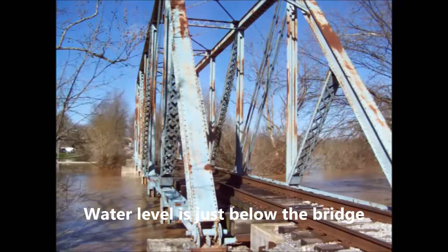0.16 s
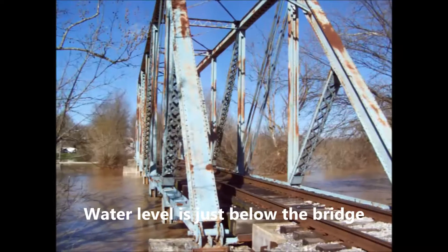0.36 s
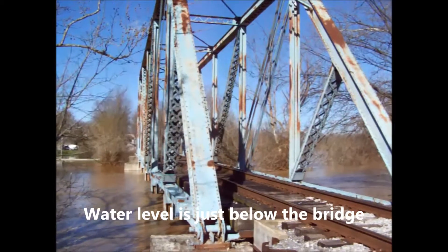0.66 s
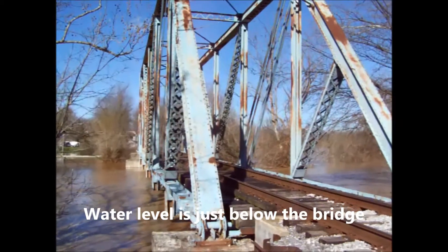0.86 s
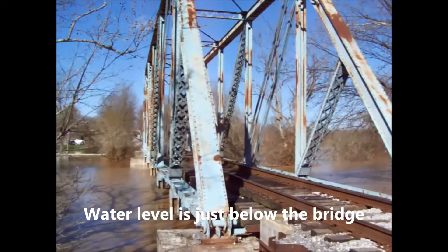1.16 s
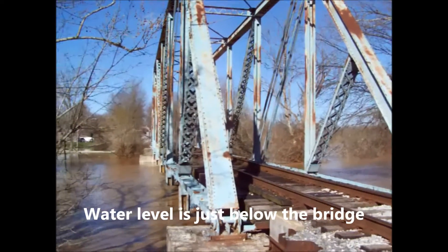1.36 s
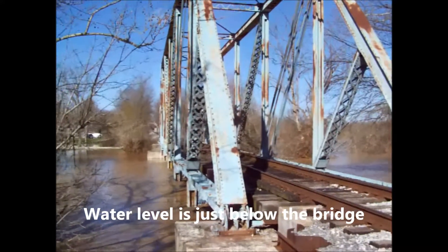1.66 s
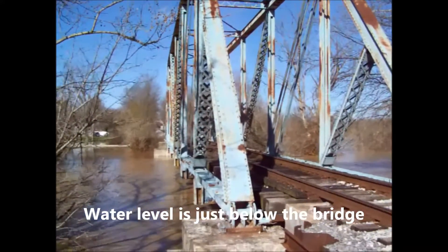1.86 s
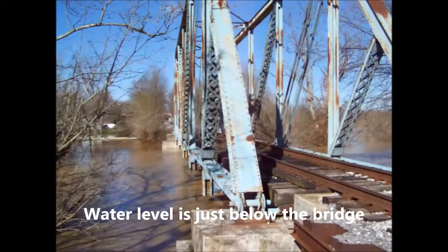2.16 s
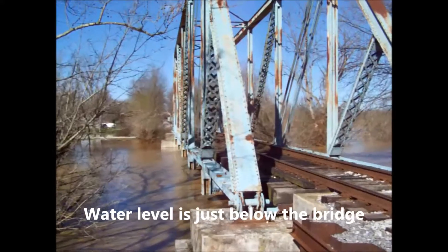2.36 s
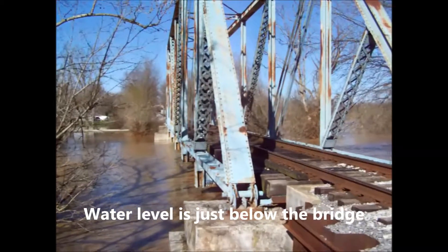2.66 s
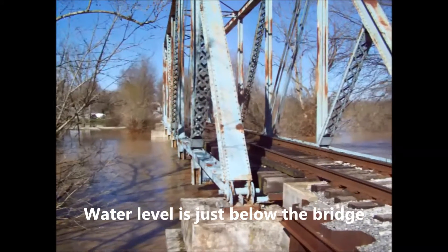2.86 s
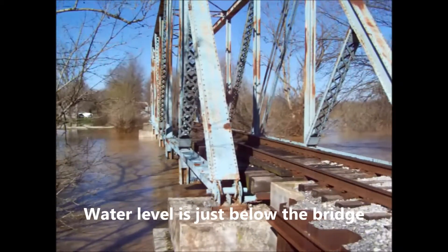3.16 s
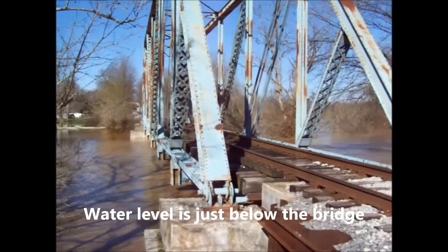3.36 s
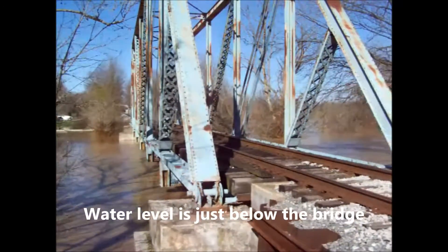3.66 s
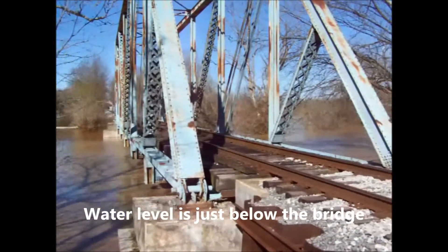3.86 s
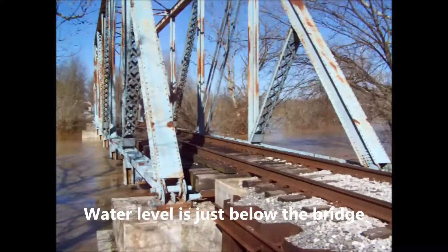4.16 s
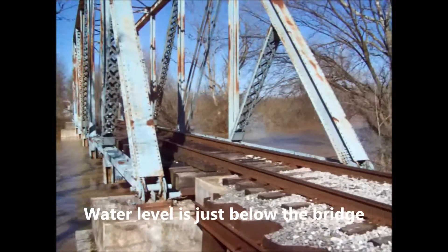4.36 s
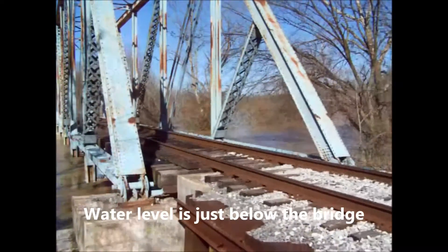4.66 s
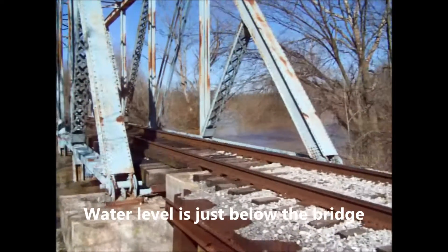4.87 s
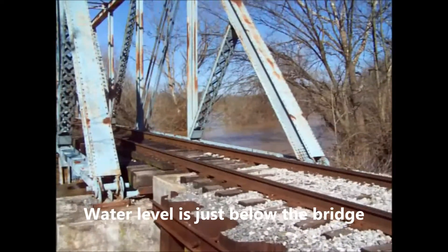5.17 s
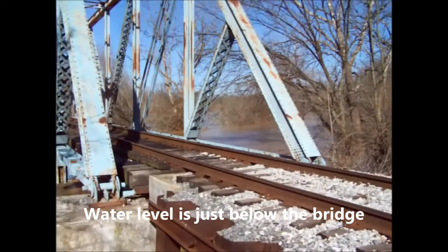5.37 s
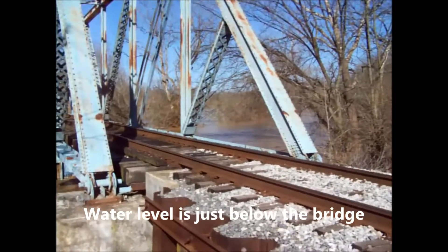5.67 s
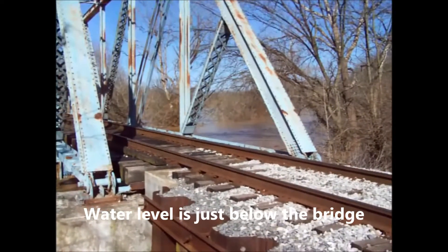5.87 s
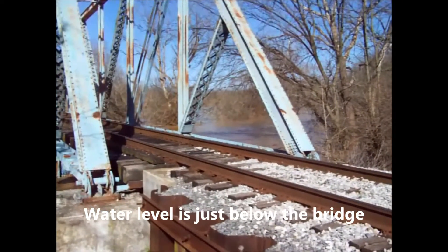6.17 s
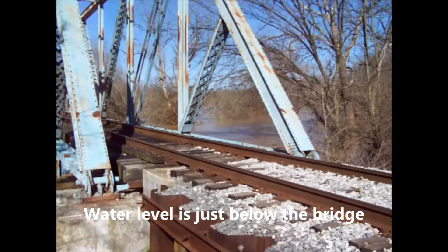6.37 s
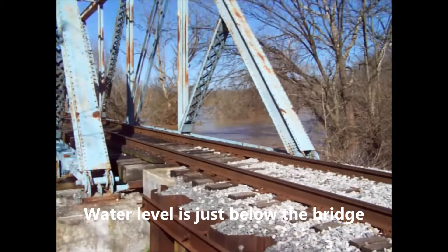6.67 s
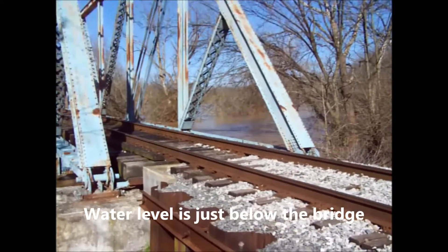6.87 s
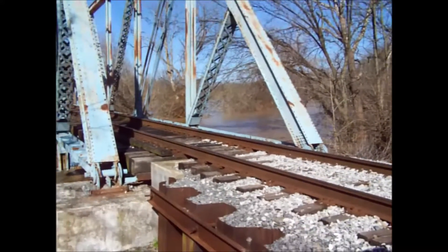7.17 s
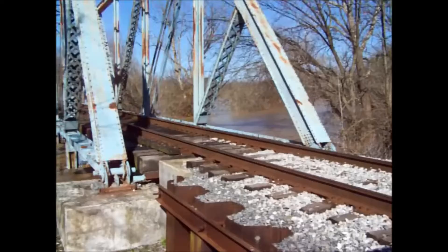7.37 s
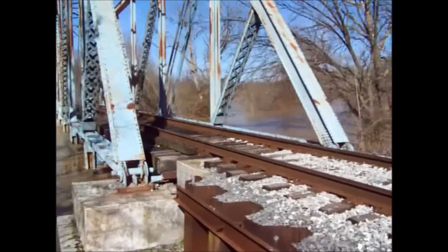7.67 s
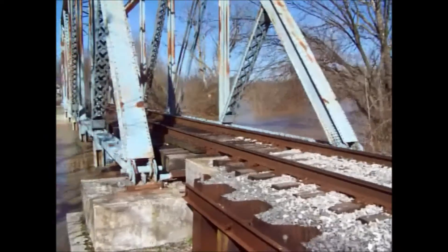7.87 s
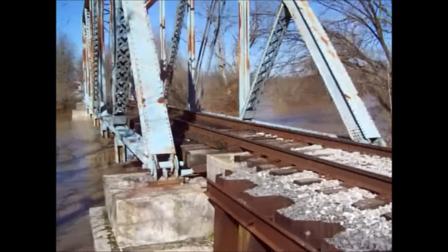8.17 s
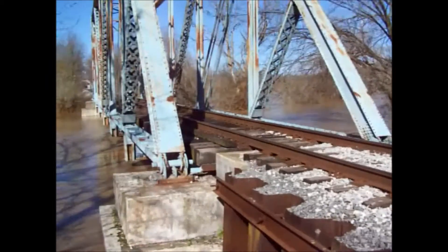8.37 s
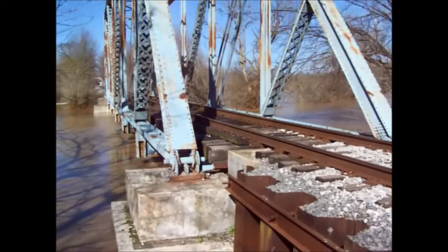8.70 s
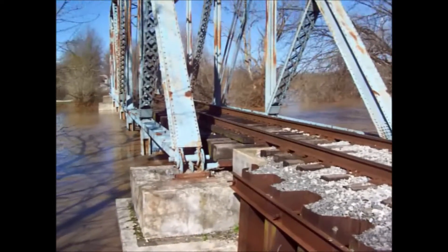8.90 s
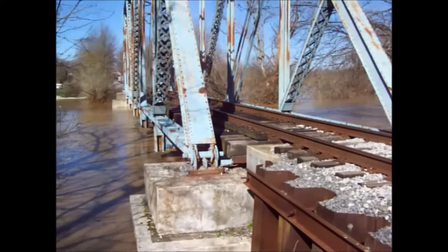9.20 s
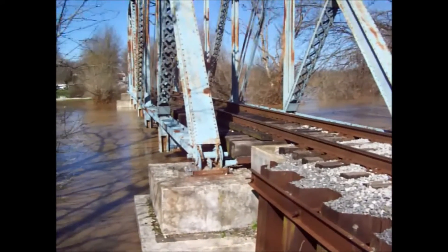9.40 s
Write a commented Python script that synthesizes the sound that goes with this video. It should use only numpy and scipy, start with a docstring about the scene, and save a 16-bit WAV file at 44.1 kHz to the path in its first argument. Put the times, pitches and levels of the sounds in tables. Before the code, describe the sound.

A muffled puff of wind lasts less than 0.1 s, then there is silence until about 0.4 s, when the outdoor scene swells in, reaching full level by 0.8 s. A flooded river rushes constantly past bridge piers: dense hiss strongest around 2 to 3.5 kHz, low churning gurgle beneath, fine fizzing spray above, flickering slightly. Its treble is brightest around 3 s, dullest near 7 s, and it grows a little louder from about 8.5 s to the end at 9.5 s. A faint far engine drones near 110 Hz, dips in pitch and fades around 2 to 2.8 s, then returns, wavering. Low wind buffets the small handheld microphone around 1 to 2 s, most strongly from 5 to 6.3 s, and again near 7.5 s. Tiny sharp water slaps tick at 2.8 and 6.4 s. Mono, without the highest treble.

```python
"""Flooded river past a steel bridge

A short puff of wind, cut off into silence, precedes a flooded river that rushes past bridge piers and fades in.
Three layers of patchy noise, each with a swarm of ringing bubbles, make the churn, foam and spray of the water;
two sharper splashes are brief rings inside bursts of foam noise. A far engine drones as one wavering sine.
Gusts and a light breeze shape low noise into buffeting, with a higher flutter, on a small hand-held camera.
Both channels carry the same signal."""
import sys
import numpy as np
from scipy import signal
from scipy.fft import rfft, irfft, next_fast_len
from scipy.io import wavfile
from scipy.ndimage import uniform_filter1d, map_coordinates

SR = 44100
rng = np.random.default_rng(int(sys.argv[2]) if len(sys.argv) > 2 else 0)


def generate_wav(sig):
    """Save sig (samples, or channels by samples) to the path in sys.argv[1] as 16-bit PCM at SR."""
    pcm = np.round(np.clip(np.atleast_2d(sig).T, -1, 1) * 32767).astype(np.int16)
    wavfile.write(sys.argv[1], SR, pcm)


N = 420713

# Spectrum of foam, in the rush and in the splashes: columns [f/Hz, level/dB]
FOAM_SPECTRUM = [(600, -31), (1200, -12), (1600, -7.5), (2000, -4), (2450, -3), (2700, -3.5), (3200, 0.4),
                 (3500, -3.5), (3900, -10.5), (4400, -18), (7000, -48)]


def amp(db):
    """Level to amplitude ratio: 20 dB is a factor of ten."""
    return 10 ** (np.asarray(db) / 20)


def unit(x):
    """Normalization to an rms value of 1."""
    return x / np.sqrt(np.mean(x ** 2) + 1e-20)


def clock():
    """Sampling: the time of every sample, in seconds."""
    return np.arange(N) / SR


def curves(rows):
    """Linear interpolation in time: one value per sample for each column after the first."""
    times, *columns = np.transpose(rows)
    return [np.interp(clock(), times, column) for column in columns]


def wobble(rate):
    """Band-limited fluctuation: a spline through random knots, rate of them per second."""
    knots = rng.standard_normal(int(N * rate / SR) + 4)
    return map_coordinates(knots, [np.arange(N) * rate / SR])


def filtered(x, response):
    """Linear filtering: the spectrum of x times a zero-phase response of frequency."""
    m = next_fast_len(N + SR // 2)  # zero padding keeps the end from wrapping round to the start
    return irfft(rfft(x, m) * response(np.fft.rfftfreq(m, 1 / SR)), m)[..., :N]


def coloured(x, spectrum):
    """Spectral shaping: levels interpolated over log frequency, then an rms of 1."""
    f, db = np.transpose(spectrum)
    return unit(filtered(x, lambda hz: amp(np.interp(np.log(hz + 1), np.log(f), db))))


def puff():
    """Turbulent pressure noise: the opening puff of wind, with a faint hiss of water above it."""
    # Spectrum of the puff: columns [f/Hz, level/dB]
    puff_spectrum = [(20, -0.5), (70, 2), (150, -3.5), (280, -9), (400, -20.5), (700, -23.5), (1500, -24.5),
                     (3500, -28.5), (4400, -36.5), (7300, -47.5), (8100, -65.5)]
    end_s = 0.086
    return amp(-26.0) * coloured(rng.standard_normal(N), puff_spectrum) * (clock() < end_s)


def rush(patchy_db):
    """Non-stationary noise: smoothed random levels swell and fade over patches of time and frequency."""
    bins = signal.stft(rng.standard_normal(N), nperseg=512)[2]
    field = rng.standard_normal(bins.shape)
    field = uniform_filter1d(field, size=7, axis=0)  # across frequency
    field = uniform_filter1d(field, size=12, axis=1)  # across time
    patchy = bins * amp(patchy_db * unit(field))
    return unit(signal.istft(patchy, nperseg=512)[1][:N])


def bubbles(count, low_hz, high_hz, cycles, spread_db, size):
    """Bubble resonance: each rings for a few cycles and rises in pitch as it nears the surface."""
    when, pitch, strength, life = rng.random((count, 4)).T[:, :, None]
    t = np.arange(size) / SR
    turns = low_hz * (high_hz / low_hz) ** pitch * t
    age = turns / (cycles * (.5 + life))
    # exponentially distributed levels: a few bubbles stand out
    loudness = amp(spread_db * np.minimum(-np.log(1 - strength), 5))
    phase = 2 * np.pi * turns * (1 + 0.038 * np.minimum(age, 2))
    rings = loudness * np.exp(-2 * age) * np.sin(phase)
    at = (when * N).astype(int) + np.arange(size)
    return unit(np.bincount(at.ravel(), rings.ravel(), N)[:N])


def river():
    """Superposed turbulence and bubble rings: large bubbles gurgle in the churn, small ones fizz in the foam."""
    # Gain of the whole rush, a little greater towards the end: columns [t/s, level/dB]
    rush_level = [(1.2, -25), (1.8, -24.5), (2.85, -24.5), (3.2, -24.5), (5.4, -24), (6.9, -24.5),
                  (8.7, -22.5), (9.5, -22.5)]
    # Aim of the camera, 1 to the open water, -1 away to the track: columns [t/s, facing]
    camera_aim = [(0.9, 0.53), (2.7, 1), (3.4, 1), (4.5, 0.012), (6.9, -1), (8.4, -0.3), (9.5, 0.7)]
    # Spectra of the low churn and the high spray: columns [f/Hz, level/dB]
    churn_spectrum = [(40, -19.5), (130, -5.5), (220, -3), (370, -3.5), (450, -8.5), (560, -1.5), (700, 0),
                      (950, -3.5), (1250, 0), (1600, -5.5), (2400, -17.5), (5000, -52.5)]
    spray_spectrum = [(2500, -23.5), (3800, -4), (4500, -2.5), (5500, 1), (6500, -2), (7350, -5),
                      (7750, -13.5), (8150, -36.5)]
    churn_db, foam_db, spray_db = -6, 0.5, -11.5  # relative to the rush, before turning and surge
    churn_turn_db, spray_turn_db = 0.6, 2  # per unit of facing: the treble is the most directional

    rush_db, = curves(rush_level)
    facing, = curves(camera_aim)
    # breaking wavelets swell all layers together, in dB
    surge_db = 0.28 * wobble(3) + .22 * wobble(7) + 0.35 * wobble(35)

    gurgle = bubbles(count=4500, low_hz=352.3, high_hz=1803, cycles=6.5, spread_db=2.0, size=900)
    fizz = bubbles(count=16000, low_hz=1420, high_hz=4150, cycles=6.6, spread_db=3.0, size=300)
    crackle = bubbles(count=12000, low_hz=3810, high_hz=8000, cycles=4.5, spread_db=3.0, size=100)

    churn = coloured(rush(patchy_db=0.47) + amp(-14.5) * gurgle, churn_spectrum)
    foam = coloured(rush(patchy_db=0.77) + amp(-11.0) * fizz, FOAM_SPECTRUM)
    spray = coloured(rush(patchy_db=0.84) + amp(-8.5) * crackle, spray_spectrum)

    churn *= amp(churn_db + churn_turn_db * facing + surge_db)
    foam *= amp(foam_db + surge_db)
    spray *= amp(spray_db + spray_turn_db * facing + surge_db)
    return amp(rush_db) * (churn + foam + spray)


def engine():
    """Periodic combustion: of a far engine only the firing tone carries, wavering in the moving air."""
    # The engine runs, throttles back, picks up and holds its speed, before the wavering:
    # columns [t/s, f/Hz, level/dB]
    engine_course = [(0.6, 111.7, -35.5), (1.6, 111.5, -36), (2.05, 84.6, -42.5), (2.8, 89, -50.5),
                     (3.1, 94.3, -34.5), (3.5, 110, -38.5), (4.6, 108, -39), (4.95, 106.4, -34),
                     (6.3, 109.5, -36), (7.2, 106, -40.5), (9.5, 107.3, -41)]
    hz, db = curves(engine_course)
    phase = 2 * np.pi * np.cumsum(hz + 1.3 * wobble(14)) / SR
    return amp(db + 2.5 * wobble(11)) * unit(np.sin(phase))


def gust(peak_s, length_s):
    """Asymmetric envelope: a gust builds quickly and dies away more slowly; 1 at its peak."""
    rise = 0.38  # share of the time scale that governs the rise
    t = (clock() - peak_s) / length_s
    return np.exp(-np.maximum(-t / rise, t / (1 - rise)) ** 1.1 / 2)


def wind():
    """Turbulent pressure on the microphone: eddies thump, and stronger gusts reach higher in pitch."""
    # Gusts: columns [t of peak/s, peak level/dB, time scale/s]
    gust_list = [(0.875, -33, 0.53), (1.479, -30.5, 0.2), (1.967, -30.5, 0.16), (3.368, -35, 0.18),
                 (5.086, -26.5, 0.12), (5.379, -28, 0.2), (5.718, -24, 0.58), (6.52, -30.5, 0.3),
                 (7.083, -35, 0.13), (7.455, -30, 0.18), (7.78, -30, 0.25)]
    # Spectra of the low buffeting and the higher flutter: columns [f/Hz, level/dB]
    buffet_spectrum = [(10, -12.5), (25, -2.5), (55, 2), (90, 0.5), (140, -3.5), (200, -18.5), (300, -18.5),
                       (600, -43.5), (2000, -67.5)]
    flutter_spectrum = [(50, -20), (120, -0.5), (180, -1.5), (300, -13.5), (700, -28.5), (2000, -58.5)]
    breeze_db, breeze_swing_db = -38.5, 2.3  # the light air between gusts
    flutter_db, flutter_grows = -2.5, 2.1  # against buffeting at the strongest; dB per dB of wind strength

    breeze = amp(breeze_db + breeze_swing_db * wobble(4))
    gust_power = sum((amp(db) * gust(s, length)) ** 2 for s, db, length in gust_list)
    strength = np.sqrt(breeze ** 2 + gust_power)
    strongest = strength.max()

    eddies = coloured(rng.standard_normal(N), buffet_spectrum)
    lumps = unit(amp(2.4 * wobble(18)) * eddies)
    flutter = coloured(rng.standard_normal(N), flutter_spectrum)
    flutter_strength = strongest * (strength / strongest) ** flutter_grows
    return strength * lumps + amp(flutter_db) * flutter_strength * flutter


def splashes(t60=0.016, attack=.0005):
    """Damped resonance: single slaps of water, each a bubble ring in a burst of foam; t60, attack in s."""
    # Splashes: columns [t/s, level before attack and decay/dB, f/Hz]
    splash_list = [(2.8439, -7, 3420), (6.4077, -5, 2970)]
    out = np.zeros(N + SR)
    t = np.arange(SR // 10) / SR
    for s, db, hz in splash_list:
        ring = np.sin(2 * np.pi * hz * t)
        foam = coloured(rng.standard_normal(N), FOAM_SPECTRUM)[:len(t)]
        envelope = amp(db - 60 * t / t60) * (1 - np.exp(-t / attack))
        out[round(s * SR):][:len(t)] += envelope * (.7 * ring + .45 * foam)
    return out[:N]


def scene():
    """Superposition: after the puff and silence all sources fade in together, alike in both channels."""
    start_s, fade_end_s, fade_from_db = 0.3835, 0.8, -28
    fade_db = np.interp(clock(), [start_s, fade_end_s], [fade_from_db, 0])  # rises evenly in dB
    outdoors = river() + engine() + wind() + splashes()
    mono = puff() + amp(fade_db) * (clock() > start_s) * outdoors
    return np.array([mono, mono])


def record(dry):
    """Band limitation: the camera keeps nothing at or above its upper limit."""
    top_hz = 8200
    return filtered(dry, lambda hz: hz < top_hz)


dry = scene()
out = record(dry)
generate_wav(out)
```